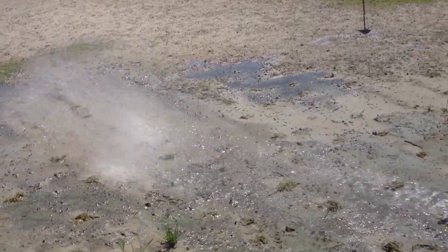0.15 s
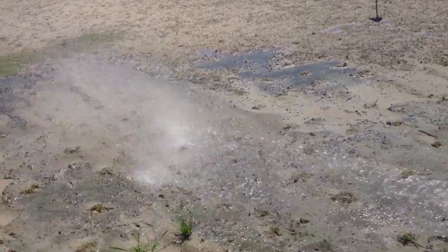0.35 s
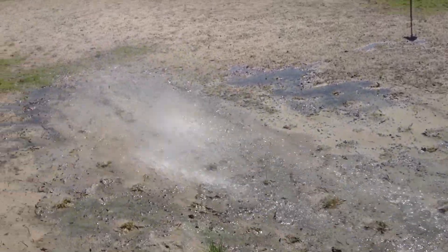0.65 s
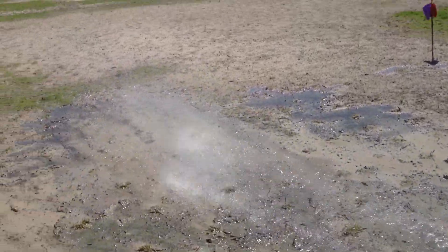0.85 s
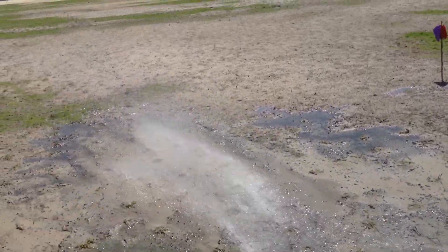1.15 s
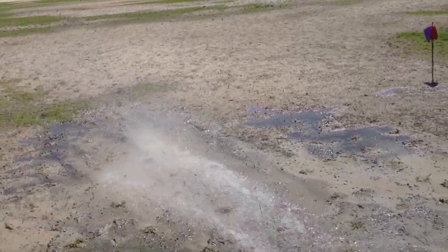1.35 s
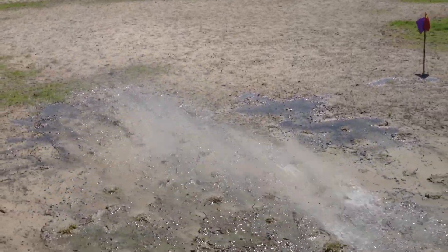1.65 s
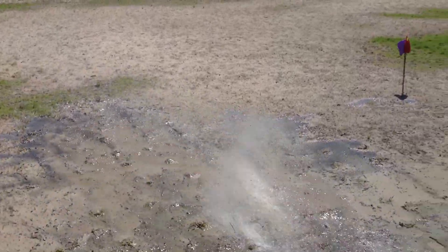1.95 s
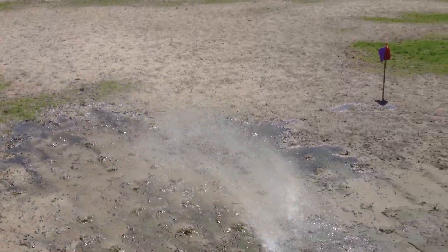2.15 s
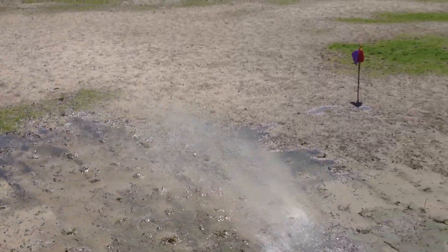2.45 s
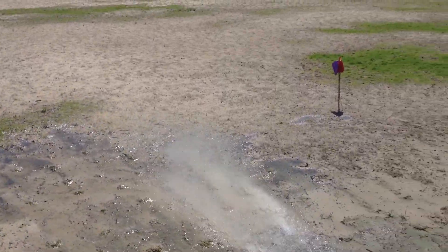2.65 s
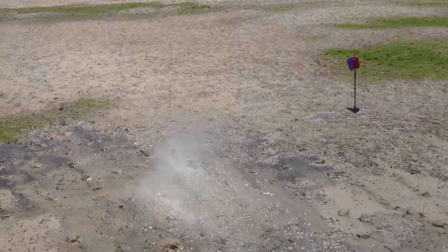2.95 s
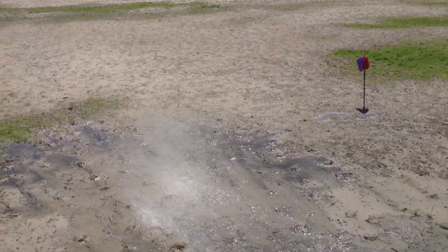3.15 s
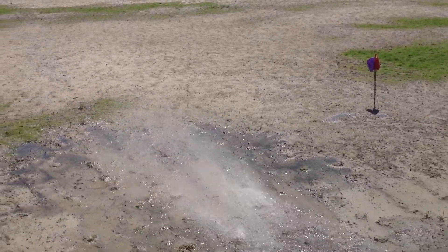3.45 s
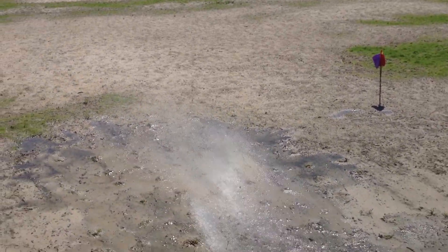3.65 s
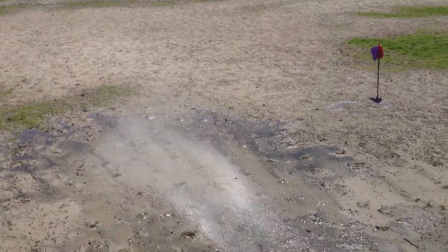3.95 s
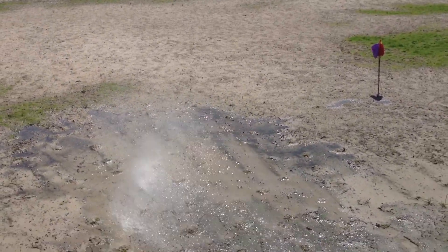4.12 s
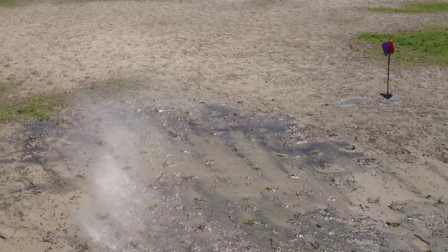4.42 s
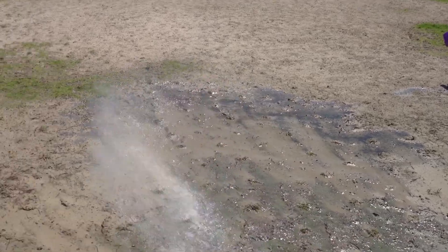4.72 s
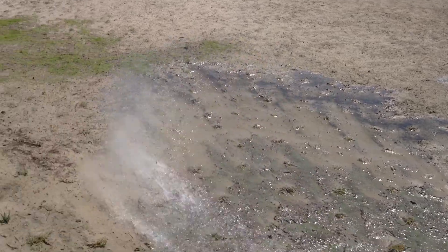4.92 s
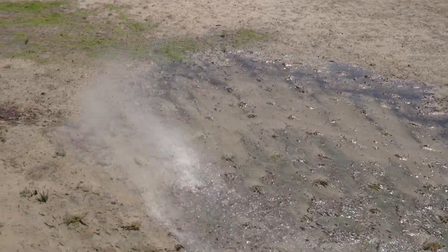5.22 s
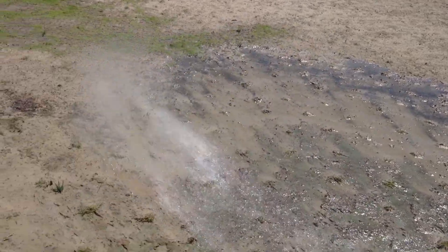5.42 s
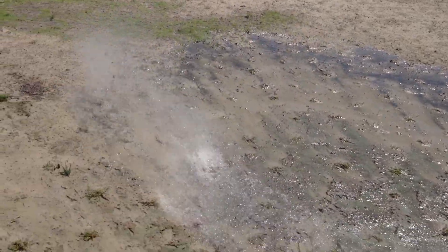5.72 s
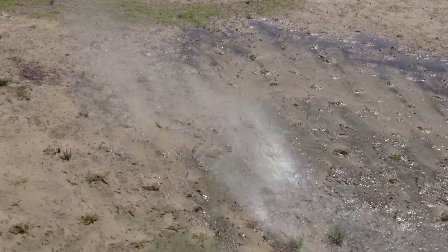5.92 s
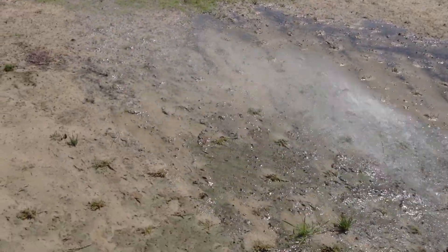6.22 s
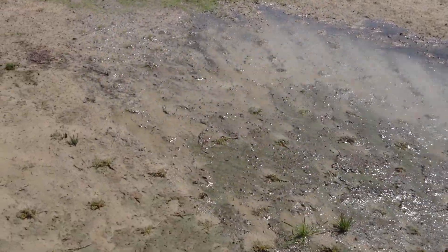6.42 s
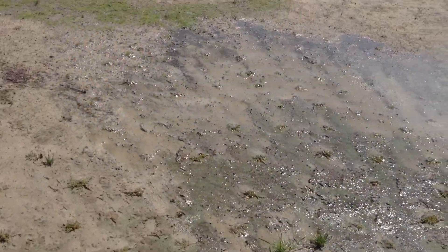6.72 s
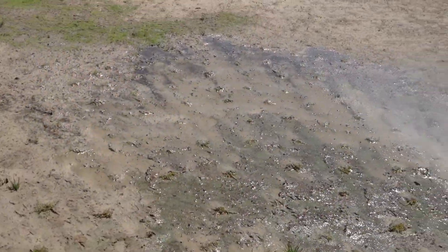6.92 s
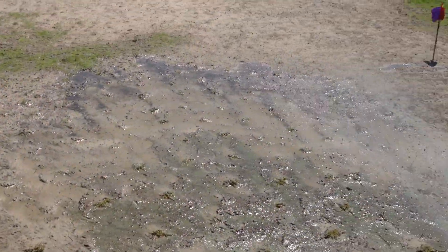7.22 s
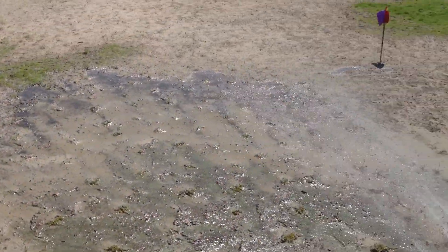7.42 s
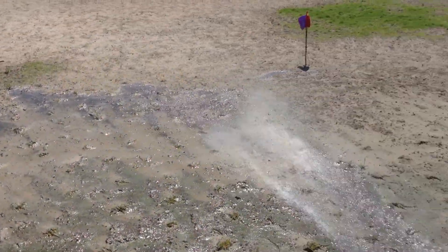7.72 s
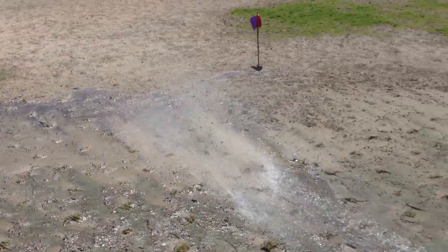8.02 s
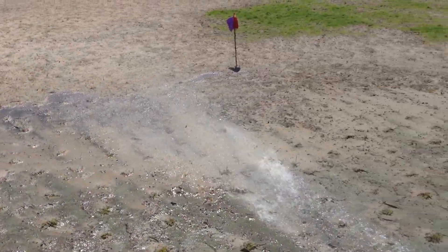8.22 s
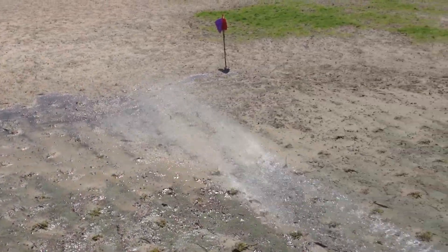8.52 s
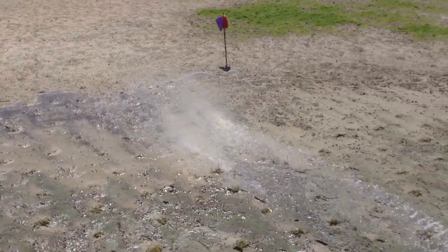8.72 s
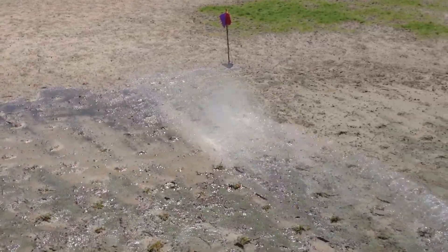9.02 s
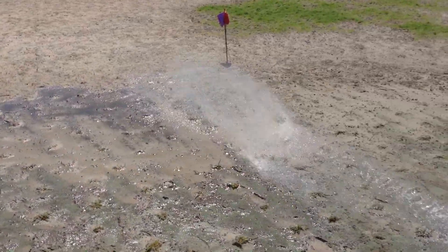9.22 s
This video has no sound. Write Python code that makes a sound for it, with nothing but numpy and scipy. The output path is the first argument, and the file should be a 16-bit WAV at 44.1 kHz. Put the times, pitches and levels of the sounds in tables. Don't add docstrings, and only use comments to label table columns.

```python
import sys
import numpy as np
from scipy import signal
from scipy.fft import rfft, irfft, next_fast_len
from scipy.io import wavfile
from scipy.ndimage import uniform_filter1d, map_coordinates

SR = 44100
rng = np.random.default_rng(int(sys.argv[2]) if len(sys.argv) > 2 else 0)


def invert_db(level):
    return 10 ** (np.asarray(level, dtype=float) / 20)


def transcribe(u):
    v = np.clip(np.atleast_2d(u).T, -1, 1)
    q = np.round(v * 32767).astype(np.int16)
    wavfile.write(sys.argv[1], SR, q)


N = 412776

# time in seconds, jet strength in dB, load of sand in the jet in dB.
JET_STRENGTH = [(0, -29, -2), (.7, -30.5, -3.5), (1.35, -30, -4), (1.6, -28, -3.5), (2.3, -31, -4),
                (2.9, -31.5, -5.5), (3.5, -31, -5.5), (4.2, -29.5, -6), (4.9, -30.5, -3.5), (5.5, -35, -2),
                (6, -29, -2.5), (6.4, -34, -1.5), (6.6, -28, -4.5), (7, -30.5, -5.5), (7.3, -25.5, -7),
                (7.7, -27.5, -6), (8.5, -30.5, -7), (9.36, -31, -2.5)]
# centre in seconds, change in dB,
# half length in seconds.
JET_SURGES = [(0.0, -3, 0.025), (0.12, 2, 0.065), (0.34, 3.5, 0.035), (0.585, 4.0, 0.035),
              (0.757, 2.5, 0.074), (0.99, 3.5, 0.039), (1.223, 3.5, 0.034), (1.46, 4.0, 0.04),
              (2.177, 2.5, 0.025), (2.46, 1.5, 0.078), (2.77, 2.5, 0.065), (3.43, 2.5, 0.04),
              (4.34, 1, 0.025), (4.776, 3, 0.045), (5.045, 3.5, 0.044), (5.265, 4.5, 0.038),
              (5.478, 6, 0.049), (5.696, 2.5, 0.031), (5.79, 4, 0.077), (5.903, 2, 0.035),
              (6.527, 2.5, 0.031), (6.83, 2, 0.067), (7.11, 5.5, 0.054), (7.49, 4, 0.04),
              (7.685, -1.5, 0.077), (7.85, 2.5, 0.054), (8.102, 3.5, 0.047), (8.303, 3, 0.039),
              (8.597, 4, 0.061), (9.29, 1.5, 0.027)]
# time in seconds, turn away from the jet from 0 to 1.
CAMERA_TURN = [(0, 0.04), (.5, 0.07), (1.35, 0.16), (1.6, .34), (2.2, 0.55), (2.75, 0.46), (2.9, 0.34),
               (4.4, 0.26), (4.8, 0.18), (5.6, 0.2), (5.9, 0.35), (6.2, 0.47), (6.45, 0.78), (6.9, 0.83),
               (7.53, 0.8), (7.66, 0.32), (8.8, 0.2), (9.36, 0.3)]
# frequency in Hz, level in dB per Hz.
JET_FROM_FRONT = [(400, -24), (700, -17), (1500, -7.5), (2900, -4.5), (3900, -3.5), (4700, -2), (5600, -5),
                  (7000, -4.5), (8600, -1.5), (10000, -4), (12000, 1), (13200, -3.5), (14100, -7.5),
                  (15300, -13)]
# frequency in Hz, level in dB per Hz.
JET_HALF_TURNED = [(400, -29), (700, -18), (1400, -9), (2300, -5), (2900, -8), (3500, -10), (4800, -8.5),
                   (5600, -13.5), (6900, -4.5), (8200, 0.5), (9700, -4.5), (12500, -7.5), (13800, -5.5),
                   (15300, -2)]
# frequency in Hz, level in dB per Hz.
JET_FROM_SIDE = [(400, -33), (700, -15.5), (1500, -10.5), (2200, -3.5), (3000, -6), (3700, -17),
                 (4400, -21), (4900, -15), (5400, -18.5), (7700, -0.5), (10100, -10.5), (11900, -11),
                 (13300, -2.5), (15300, -5)]
# frequency in Hz, share of spatter from 0 to 1.
SPATTER_SHARE = [(500, 0.9), (1500, 0.57), (5500, 0.81), (7000, 0.16)]
# time in seconds, lift in dB.
FINE_DUST = [
    (0, -5),
    (.9, -7),
    (1.5, -4),
    (2.6, 0),
    (5.1, 0),
    (5.5, -4),
    (6, -1.5),
    (8.6, 2),
    (9, -4),
]
# time in seconds, level in dB.
LARGE_CLUMPS = [(.426, -23.5), (.816, -24), (1.468, -22), (1.548, -21), (1.668, -20.5), (1.857, -25),
                (1.922, -24), (2.789, -20.5), (4.768, -26), (4.815, -23), (4.9, -23.5), (5.085, -19.5),
                (5.102, -19), (5.278, -25), (5.31, -20), (5.447, -26), (5.69, -21), (5.783, -19.5),
                (6.055, -23), (.329, -28), (6.861, -23.5), (7.115, -19), (7.517, -18), (8.091, -22),
                (8.152, -19), (8.304, -24), (8.582, -21), (8.611, -25), (8.644, -24), (5.113, -28)]
# time in seconds, level in dB.
BREEZE_LEVEL = [(0, -50), (.6, -53), (1.5, -55.5), (2.4, -54.5), (3.3, -61), (4.2, -58.5), (4.7, -42),
                (5.7, -46), (6.2, -58.5), (7.2, -60), (8, -52.5), (9.36, -49)]
# centre in seconds, rise in dB, half length in seconds.
BREEZE_GUSTS = [(0.026, 10, .03), (0.186, 11, 0.043), (0.348, 16, 0.055), (.63, 6, .014), (2.008, 6.5, .04),
                (2.385, 16, .035), (2.461, 5, 0.013), (3.03, 20.5, 0.043), (3.1, 14, .015), (3.42, 25, .02),
                (3.48, 17, 0.024), (3.61, 11, 0.039), (3.89, 6.5, 0.13), (4.414, 20.5, 0.017),
                (4.603, 11.5, 0.048), (5.15, 9, 0.063), (5.345, 11, .03), (5.61, 12, .035), (5.7, 2, 0.011),
                (5.825, 12, 0.012), (6.187, 14, 0.02), (6.51, 11, .025), (6.74, 17, 0.025), (7.83, 7, .035),
                (8.18, 8, .025), (8.7, 19.5, 0.054), (8.868, 11, 0.014), (8.99, 27.5, 0.044),
                (9.115, 21, .025), (9.31, 8, 0.061)]
# time in seconds, peak in dB, pitch in Hz.
HARD_POPS = [(.408, -28.5, 207), (3.029, -29.5, 208), (3.413, -17.5, 282), (3.613, -25.5, 206),
             (4.408, -26, 195), (4.563, -21.5, 220), (4.589, -24.5, 227), (3.098, -30, 210),
             (4.634, -24, 264), (5.127, -26, 210), (5.093, -29, 200), (5.15, -29, 210), (5.208, -24.5, 193),
             (5.345, -23.5, 270), (5.589, -24.5, 180), (5.622, -26, 180), (5.693, -25, 199),
             (8.165, -28, 171), (8.623, -23, 260), (8.689, -23.5, 180), (8.733, -16, 260),
             (5.194, -27, 190), (8.957, -20.5, 232), (8.981, -18, 262), (8.997, -15.5, 427),
             (9.011, -19, 300), (2.991, -29, 229), (9.101, -21.5, 220), (9.115, -18.5, 276),
             (8.972, -20, 280)]
# frequency in Hz, level in dB per Hz.
EDDY_SPECTRUM = [(15, -71), (25, -41), (49, -7), (123, 4), (172, 5), (271, -9.5), (389, -13.5), (500, -27),
                 (650, -56), (1100, -120)]
# frequency in Hz, level in dB per Hz.
ROAR_SPECTRUM = [(60, -46), (130, -10.5), (200, -1), (330, -0.5), (540, -6), (800, -3.5), (1200, -7),
                 (2000, -18.5)]

SMALL_CLUMPS, SMALL_POPS = 40, 300


def jet():
    turn_loss_db = 5
    surge_share = 0.32
    dust_with_surge = 0.4

    flutter = invert_db(0.37 * wobble(13) + 0.21 * wobble(60) + 0.78 * wobble(400))
    grain_hits = rng.random(N) < 1200 / SR
    grit = unit(rng.standard_normal(N) * grain_hits * invert_db(12 * rng.random(N)))
    air = unit(flutter * (rng.standard_normal(N) + 0.27 * grit))
    hz, t, (stream, thrown) = signal.stft([air, clumps()], SR, nperseg=256)

    slow_db, load_db = curves(JET_STRENGTH, t)
    surge_db = swells(JET_SURGES, t)
    turn = np.clip(curves(CAMERA_TURN, t)[0], 0, 1)
    hiss_db = slow_db + surge_db
    spatter_db = load_db - turn_loss_db * turn - surge_share * surge_db
    dust_db = curves(FINE_DUST, t)[0] + dust_with_surge * surge_db

    colour_db = 0
    for k, side in enumerate([JET_FROM_FRONT, JET_HALF_TURNED, JET_FROM_SIDE]):
        nearness = np.clip(1 - np.abs(2 * turn - k), 0, 1)
        colour_db = colour_db + np.outer(along(side, hz), nearness)
    colour = invert_db(colour_db)

    def band_level(low_hz, high_hz):
        band = (hz > low_hz) & (hz < high_hz)
        return np.sqrt(np.sum(colour[band] ** 2, axis=0) / len(hz))

    hiss, body = band_level(6500, 12500), band_level(1300, 6000)
    sand = np.clip(along(SPATTER_SHARE, hz), 0, 1)[:, None]
    lift = (invert_db(spatter_db - 0.5) * hiss / body) ** sand
    dust_band = np.exp(-0.5 * ((hz - 4700) / 1000) ** 2)
    lift *= invert_db(np.outer(dust_band, dust_db))
    patches = uniform_filter1d(rng.standard_normal(stream.shape), size=9, axis=0)
    patches = uniform_filter1d(patches, size=16, axis=1)
    steady = stream * lift * invert_db(0.79 * unit(patches) + hiss_db) / hiss
    spatter = thrown * (sand + 0.088) / body
    return signal.istft(colour * (steady + spatter), SR, nperseg=256)[1][:N]


def clumps():
    small_clump_db, scatter_db = 2, -1
    half_s = 0.0016
    lead = SR // 40
    t = np.arange(-lead, lead) / SR
    shower = np.zeros(N + SR)
    when, size, _ = scattered(SMALL_CLUMPS)
    jet_db = curves(JET_STRENGTH, when)[0] + swells(JET_SURGES, when)
    small = zip(when, jet_db + small_clump_db + scatter_db * size)
    for start, db in [*LARGE_CLUMPS, *small]:
        spread = invert_db(0.77 * (db + 26))
        burst = np.exp(-0.5 * (t / half_s / spread) ** 2)
        shower[round(start * SR):][:len(t)] += invert_db(db - 4.5) / spread ** 0.5 * burst
    return shower[lead:][:N] * unit(rng.laplace(size=N))


def breeze():
    buffet_db = buffeting(np.arange(N) / SR)
    eddy_db = np.minimum(buffet_db, 0.71 * (buffet_db + 39.0) - 40.5) - 3.5
    eddies = invert_db(eddy_db) * unit(invert_db(1.6 * wobble(25) + 3.5 * wobble(70)) * noise(EDDY_SPECTRUM))
    torn_spectrum = [(200, -18), (450, -5), (700, -9), (1100, -14.5), (1800, -60)]  # Hz, dB per Hz
    torn_db = 1.46 * (buffet_db + 21.0) - 38.0
    torn = invert_db(torn_db) * unit(invert_db(2.6 * wobble(90)) * noise(torn_spectrum))
    return eddies + torn + port_pops()


def port_pops():
    over_buffeting_db, limit_db, scatter_db = 4.5, -30.5, 0.5
    middle_hz, pitch_spread = 222, 0.16
    lead = SR // 50
    t = np.arange(-lead, SR // 25) / SR
    pops = np.zeros(N + SR)

    when, size, pitch = scattered(SMALL_POPS)
    when = when[rng.permutation(SMALL_POPS)]
    when[:len(BREEZE_GUSTS)] = np.transpose(BREEZE_GUSTS)[0]
    size[:len(BREEZE_GUSTS)] = 0
    small_db = np.minimum(buffeting(when) + over_buffeting_db, limit_db) + scatter_db * size
    small_hz = middle_hz * np.exp(pitch_spread * pitch)
    every_pop = [*HARD_POPS, *zip(when, small_db, small_hz)]
    signs = rng.choice([-1, 1], size=len(every_pop))

    for (start, db, hz), sign in zip(every_pop, signs):
        turns = 1.02 * hz * t
        rise = -0.5 * (np.minimum(turns, 0) / 0.38) ** 2
        decay = np.maximum(turns, 0) / 1.5
        falling_turns = turns / (1 + 0.15 * turns * (turns > 0))
        ring = np.exp(rise - decay) * np.cos(2 * np.pi * falling_turns)
        edge = invert_db(db + 10.0) * np.exp(-0.5 * (hz * t / 0.076) ** 2)
        pops[round(start * SR):][:len(t)] += sign * invert_db(db - 0.5) * (ring + edge)
    return pops[lead:][:N]


def buffeting(t):
    light_air_db, light_air_falls, port_db = -52.5, 1, 3.5
    wind_db = curves(BREEZE_LEVEL, t)[0] + swells(BREEZE_GUSTS, t, edge=3.1)
    return wind_db + port_db + light_air_falls * np.minimum(wind_db - light_air_db, 0)


def roar():
    level_db, fade_from_s, fade_db_per_s = -45, 7.6, 2
    fade_db = fade_db_per_s * np.maximum(np.arange(N) / SR - fade_from_s, 0)
    return invert_db(level_db - fade_db + 0.85 * wobble(3.13)) * noise(ROAR_SPECTRUM)


def swells(rows, t, edge=2):
    return sum(db * np.exp(-0.5 * np.abs((t - s) / half) ** edge) for s, db, half in rows)


def scattered(count):
    draw = rng.standard_normal((count, 2))
    when = (np.arange(count) + rng.random(count)) / count * (N - 1) / SR
    return when, draw[:, 0], draw[:, 1]


def unit(x):
    return x / np.sqrt(np.mean(x ** 2) + 1e-20)


def along(points, hz):
    f, v = np.transpose(points)
    return np.interp(np.log(hz + 1), np.log(f + 1), v)


def curves(rows, t):
    s, *columns = np.transpose(rows)
    return [np.interp(t, s, column) for column in columns]


def wobble(rate):
    knots = rng.standard_normal(int(N * rate / SR) + 4)
    return unit(map_coordinates(knots, [np.arange(N) * rate / SR]))


def filtered(x, response):
    m = next_fast_len(N + 8192)
    return irfft(rfft(x, m) * response(np.fft.rfftfreq(m, 1 / SR)), m)[..., :N]


def noise(spectrum):
    return unit(filtered(rng.standard_normal(N), lambda hz: invert_db(along(spectrum, hz))))


def scene():
    return (jet() + breeze() + roar())[None]


def top_cut(x):
    return signal.sosfilt(signal.butter(12, 15700, fs=SR, output="sos"), x)


def record(dry):
    def microphone(hz):
        return (hz < 15300) / np.sqrt(1 + (100 / (hz + 1)) ** 5)

    return top_cut(filtered(dry, microphone))


dry = scene()
out = record(dry)
transcribe(out)
```